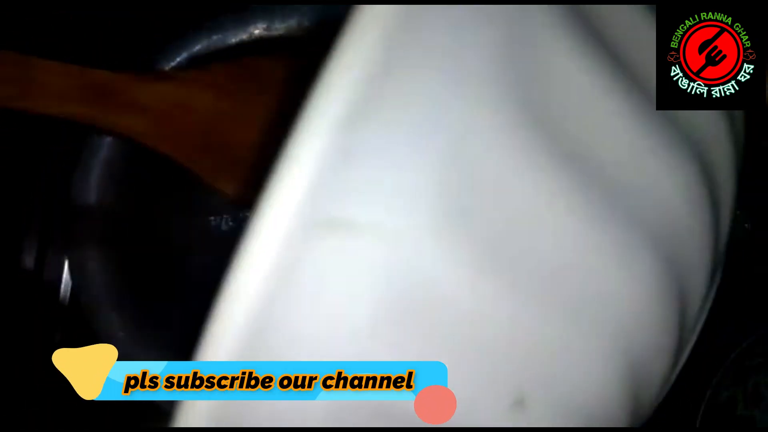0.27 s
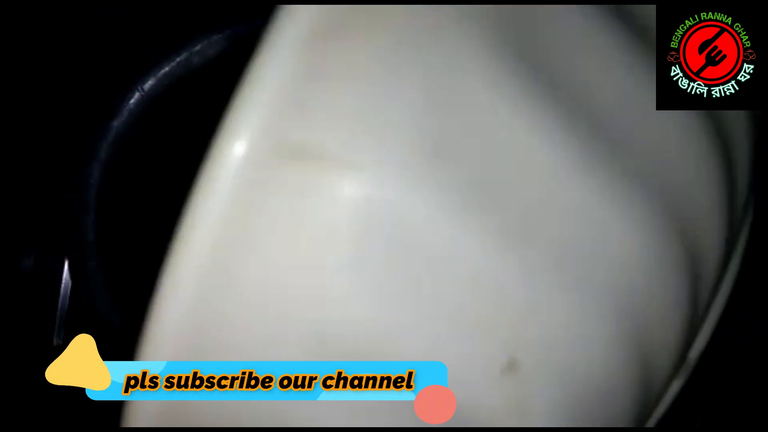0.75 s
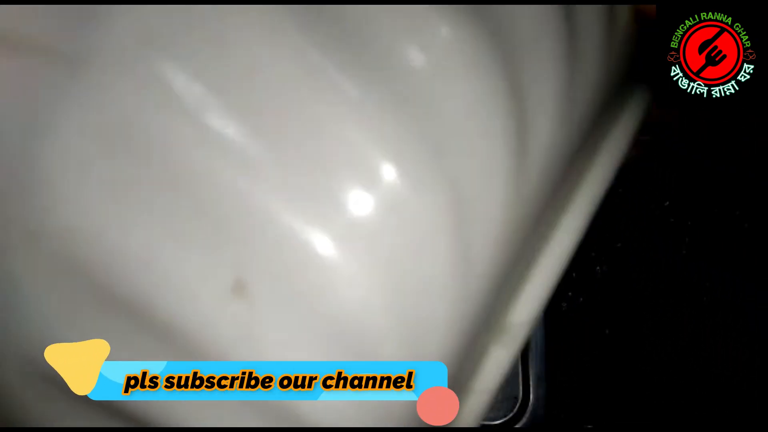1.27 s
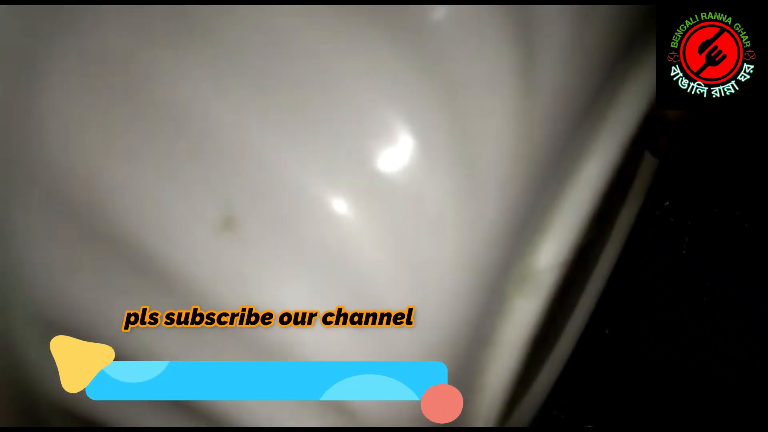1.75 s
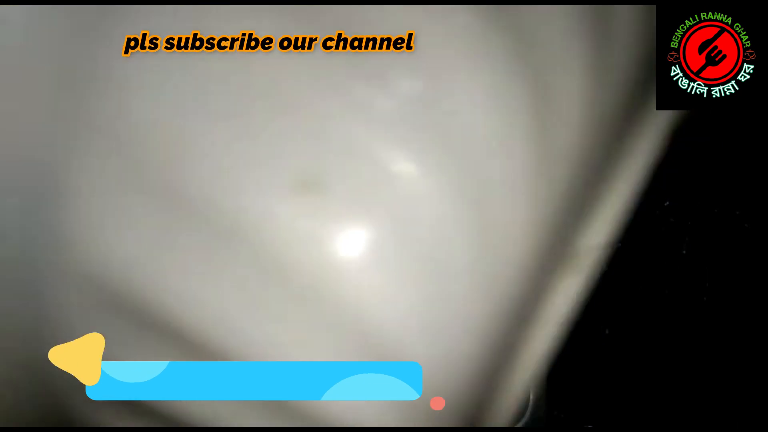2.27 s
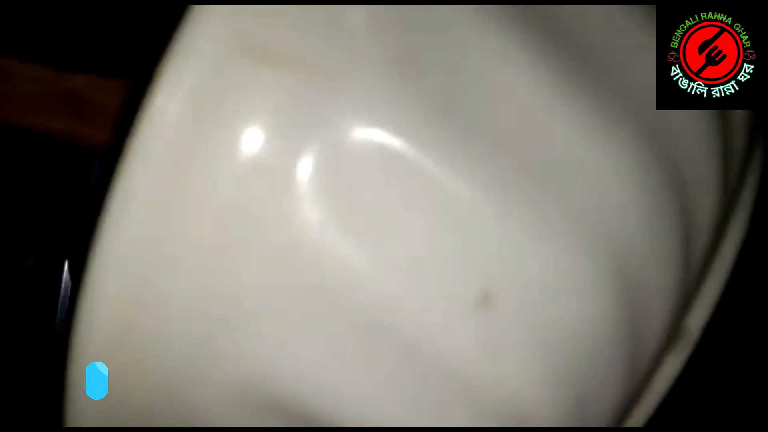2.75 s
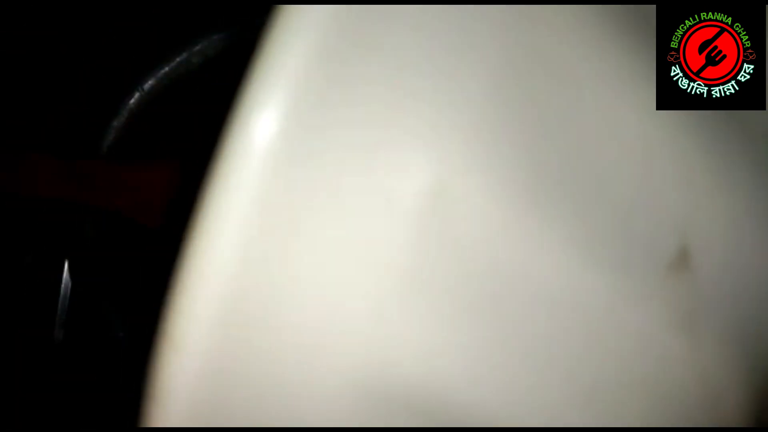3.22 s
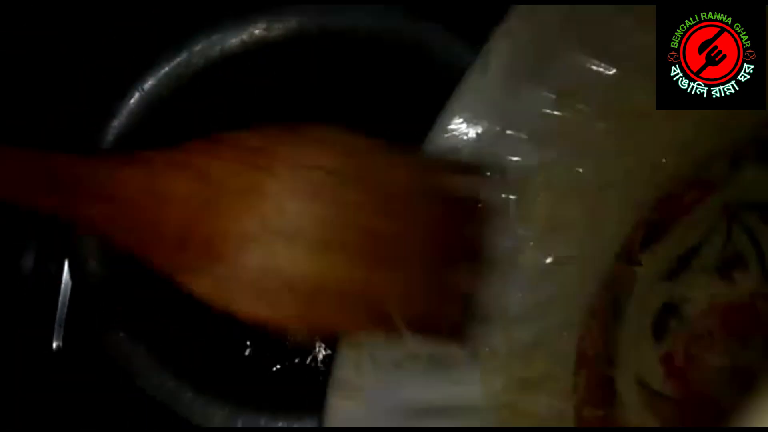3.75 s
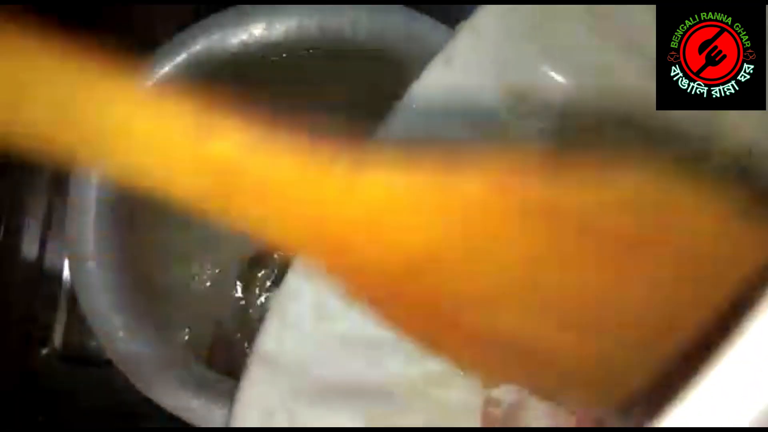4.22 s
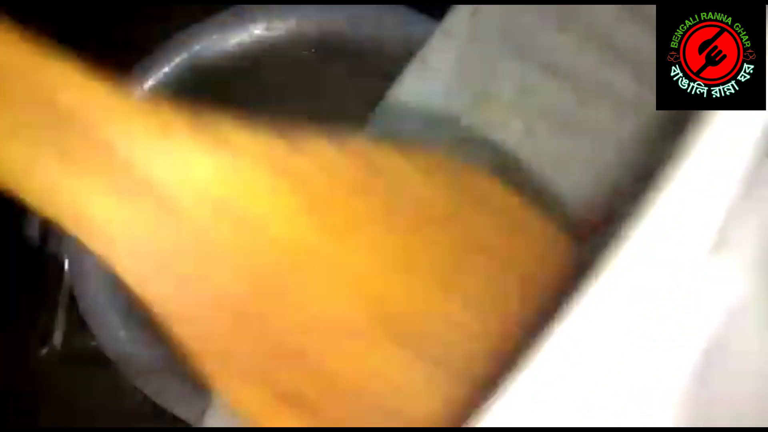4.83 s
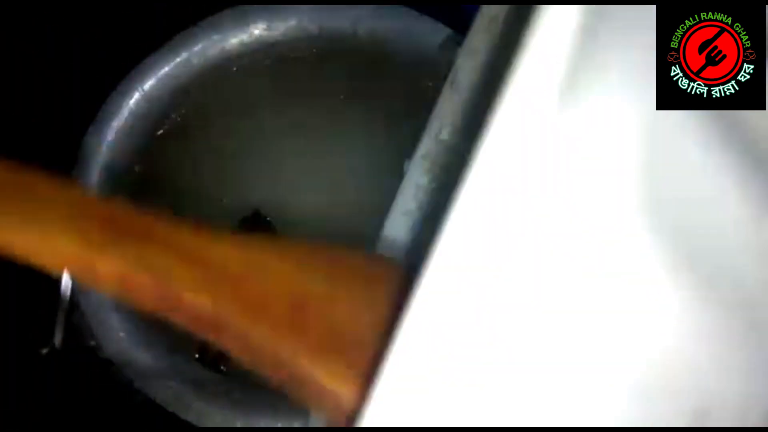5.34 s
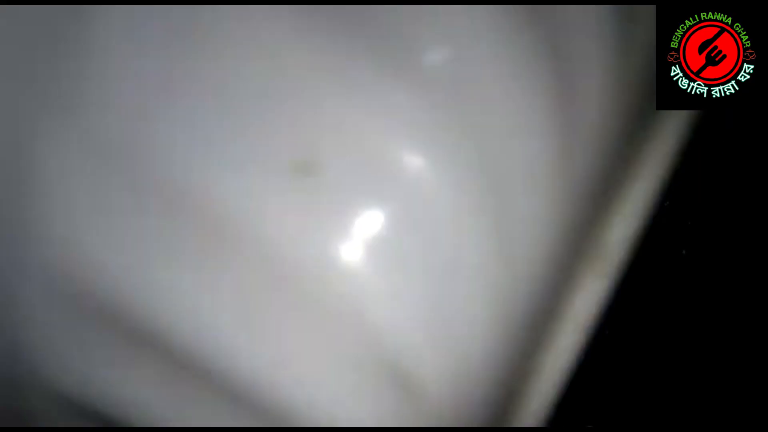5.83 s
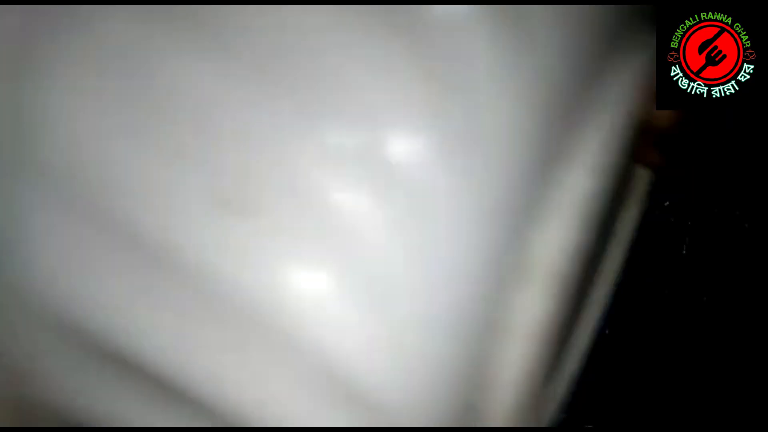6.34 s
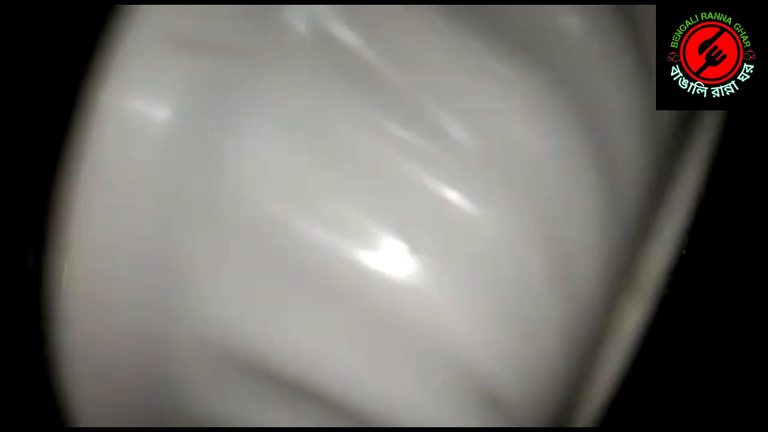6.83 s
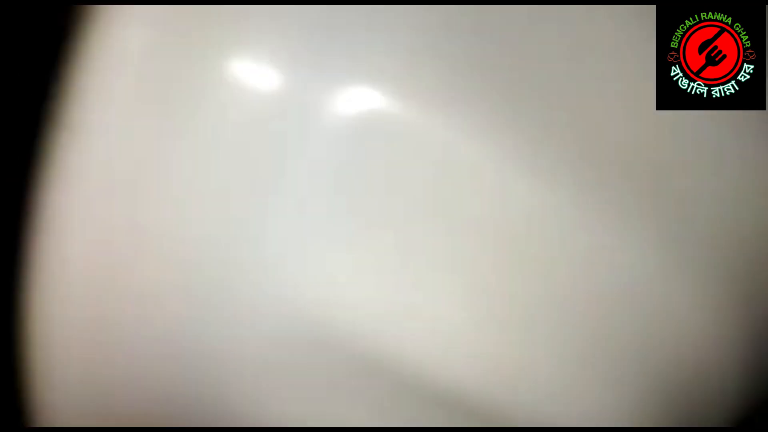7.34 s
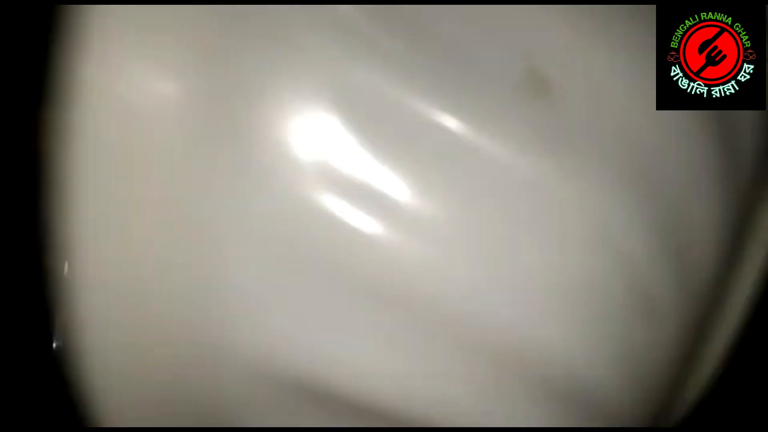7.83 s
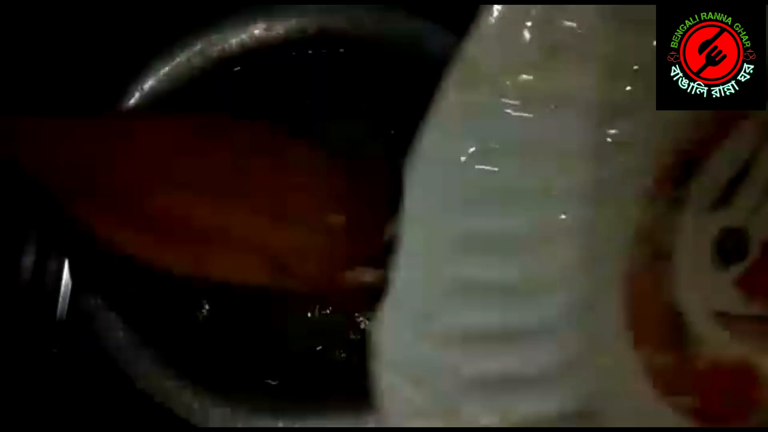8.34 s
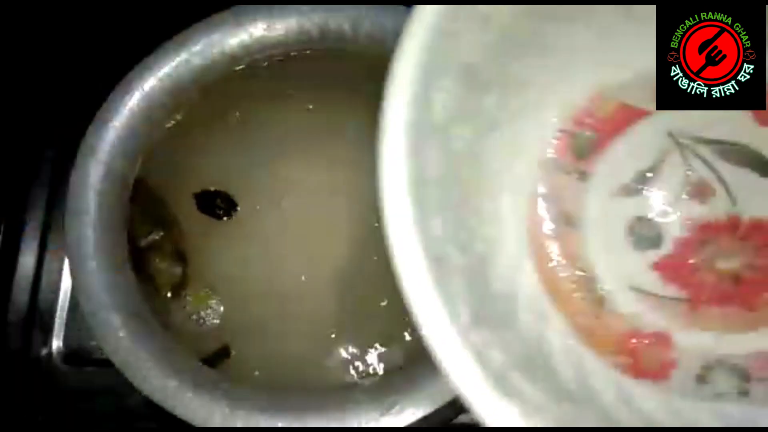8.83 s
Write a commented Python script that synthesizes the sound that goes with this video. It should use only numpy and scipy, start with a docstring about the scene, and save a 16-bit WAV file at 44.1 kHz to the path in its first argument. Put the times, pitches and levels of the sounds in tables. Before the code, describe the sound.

A wooden spatula scrapes wet rice from a plastic bowl, soft rustles and rasps giving way to hollow knocks that grow loud and crowded.

```python
"""From the start a wooden spatula works on a hard bowl; a low rumble, faint simmer and microphone hiss run throughout.
In a small kitchen, close to a small microphone, it pushes wet rice from the plastic bowl into a pot of hot water.
Pushes drive rustling grains (short rings), rubbing (bowl modes) and an edge rasp (clicks through resonances).
Knocks strike the bowl's modes, ticks are puffs of noise, gurgles are rising sines, and the room adds a tail."""
import sys
import numpy as np
from scipy import signal
from scipy.fft import rfft, irfft, next_fast_len
from scipy.io import wavfile

SR = 44100
rng = np.random.default_rng(int(sys.argv[2]) if len(sys.argv) > 2 else 0)


def dump_mix(stems):
    """Bounce the given channels to the path in sys.argv[1] as a 16-bit WAV at rate SR."""
    frames = np.atleast_2d(stems).T  # one column per channel
    limited = np.clip(frames, -1, 1)  # hard clip at full scale
    pcm = np.round(limited * 32767).astype(np.int16)
    wavfile.write(sys.argv[1], SR, pcm)


N = 400428   # length in samples


def from_db(db):
    """Amplitude factor for a level in dB."""
    return 10 ** (np.asarray(db) / 20)


def rms_one(x):
    """Scales a sound to an rms of 1."""
    return x / np.sqrt(np.mean(x ** 2) + 1e-20)


def at_hz(points, hz):
    """Reads a curve of (Hz, value) points on a logarithmic frequency axis."""
    point_hz, values = np.transpose(points)
    return np.interp(np.log(hz), np.log(point_hz), values)


def colour(x, spectrum):
    """Gives a flat sound the spectrum (Hz, relative dB per Hz); rms 1."""
    size = next_fast_len(len(x))
    hz = np.arange(size // 2 + 1) * SR / size + 1   # the 1 avoids the logarithm of zero
    gain = from_db(at_hz(spectrum, hz))
    return rms_one(irfft(rfft(x, size) * gain, size)[:len(x)])


def drift(rate_hz):
    """Slow random wander of rms 1: noise through two equal one-pole lowpasses."""
    r = np.exp(-2 * np.pi * rate_hz / SR)
    noise = rng.standard_normal(N + SR)
    settled = signal.lfilter([1], [1, -2 * r, r * r], noise)[SR:]
    return rms_one(settled)


def ring(clicks, hz, t60_s):
    """A resonance: a unit click starts a sine of height 1 that falls by 60 dB in t60_s."""
    r = from_db(-60 / (t60_s * SR))
    w = 2 * np.pi * hz / SR
    return signal.lfilter([0, np.sin(w)], [1, -2 * r * np.cos(w), r * r], clicks + 1e-18)


def grains(per_s, spread_db):
    """Random clicks of very unequal size and either sign, per_s of them a second on average; rms 1."""
    size_db = spread_db * np.minimum(rng.exponential(1, N), 5)
    sizes = from_db(size_db) * rng.choice([-1, 1], N)
    return rms_one(sizes * (rng.random(N) < per_s / SR))


# Colour of the low rumble. Each row: frequency in Hz, relative level in dB per Hz.
RUMBLE_SPECTRUM = [(15, -49.5), (25, -23), (61, -3.5), (118, 6), (144, 3.5), (317, -12.5), (400, -4),
                   (520, -35.5), (880, -120)]
# Rise and fall of the rumble around which it drifts. Each row: time in seconds, level in dB.
RUMBLE_LEVEL = [(0.0, -66), (0.25, -62.5), (1.64, -65.5), (1.97, -58.5), (3.74, -62), (4.47, -54),
                (4.73, -66), (5.51, -60.5), (5.64, -57), (6.68, -65.5), (6.85, -55), (7.0, -61),
                (7.23, -54.5), (7.36, -46), (8.02, -69), (8.42, -66), (8.67, -65.5), (9.08, -65.5)]


def rumble():
    """Low noise whose level follows a curve and wavers at random."""
    level_db = np.interp(np.arange(N) / SR, *np.transpose(RUMBLE_LEVEL))
    return from_db(level_db + 2.5 * drift(12)) * colour(rng.standard_normal(N), RUMBLE_SPECTRUM)


# Colour of the simmering pot, shared by the hiss. Each row: frequency in Hz, relative level in dB per Hz.
SIMMER_SPECTRUM = [(150, -17), (250, 5), (474, -4.5), (554, 6.5), (1390, -4.5), (2130, -7), (5530, -11),
                   (6570, -12.5), (8520, -25.5), (12000, -30), (15600, -29.5)]
SIMMER_DB = -66   # level around which the simmer wavers
HISS_DB = -79


def simmer():
    """The hot water is a faint coloured noise that wavers slowly in level."""
    return from_db(SIMMER_DB + 2.2 * drift(3.0)) * colour(rng.standard_normal(N), SIMMER_SPECTRUM)


def hiss():
    """The microphone's hiss is steady noise of the same colour as the simmer."""
    return from_db(HISS_DB) * colour(rng.standard_normal(N), SIMMER_SPECTRUM)


# Pushes of the spatula. Each row: loudest moment in seconds, swell in seconds, fade in seconds,
# control levels at that moment in dB for the rustle of rice, the rubbing of the bowl and the rasp of the edge.
STROKES = [(0.04, 0.061, 0.038, -57, -58, -55), (0.4, 0.21, 0.27, -45.5, -51, -53),
           (0.8, 0.3, 0.63, -59.5, -51, -74), (1.3, 0.32, 0.6, -47.5, -55.5, -76),
           (1.62, 0.32, 0.16, -44, -53.5, -73), (2.1, 0.47, 0.11, -55.5, -61, -45),
           (2.55, 0.24, 0.36, -53, -46.5, -50.5), (3.03, .05, 0.062, -57.5, -48.5, -45),
           (3.36, 0.45, 0.43, -65.5, -53.5, -65), (4.1, 0.38, 0.49, -61, -61, -55),
           (4.57, 0.14, 0.22, -44.5, -42.5, -41.5), (4.872, 0.03, 0.24, -56, -68, -52.5),
           (5.17, 0.23, 0.15, -53.5, -42, -47.5), (5.652, 0.15, 0.18, -44.5, -54, -42),
           (6.08, 0.37, .2, -52.5, -46.5, -53), (6.45, 0.18, 0.12, -54, -51, -55.5),
           (6.858, 0.16, 0.12, -52.5, -61.5, -58), (7.05, 0.22, 0.11, -53, -61.5, -64),
           (7.44, 0.14, 0.23, -42, -67, -35), (7.82, 0.076, 0.17, -52.5, -44.5, -52),
           (8.0, 0.045, 0.033, -59, -61, -65), (8.22, 0.05, 0.078, -57.5, -38.5, -41.5),
           (8.449, 0.26, 0.13, -73, -48, -71)]
STROKE_DROP_DB = 18.5   # loss at one swell or fade time from the loudest moment
REST_DB = -78.5         # control level that trickles on between pushes


def strokes():
    """Each push swells to its loudest moment and fades; gives control levels of rustle, rubbing and rasp in dB."""
    t = np.arange(0, N + 100, 100) / SR   # one point every 100 samples
    power = from_db(2 * REST_DB)          # doubled dB turn amplitude into power
    for loudest_s, swell_s, fade_s, *levels_db in STROKES:
        before = (loudest_s - t) / max(swell_s, .01)
        after = (t - loudest_s) / max(fade_s, .01)
        away = np.where(t < loudest_s, before, after)
        push_db = np.array(levels_db)[:, None] - STROKE_DROP_DB * away ** 1.6
        power = power + from_db(2 * push_db)
    return [np.interp(np.arange(N) / SR, t, 10 * np.log10(p)) for p in power]


# Colour of the rustling rice. Each row: frequency in Hz, relative level in dB per Hz.
RUSTLE_SPECTRUM = [(530, -26), (900, -8), (1090, -1), (1320, -2.5), (1780, -6), (2030, -3.5), (3080, -3.5),
                   (3590, 3), (6080, 1), (9120, -19), (11900, -27), (14900, -25), (15600, -33)]


def rice(rustle_db):
    """Thousands of wet grains a second slide in clumps; each rings a few cycles at one of 16 pitches."""
    clicks = from_db(3.5 * drift(30)) * grains(5000, spread_db=3.5)
    pitches_hz = np.geomspace(1000, 14000, 16)
    dealt = rng.integers(0, 16, N)   # which pitch a click at each sample gets
    rings = np.zeros(N)
    for k, hz in enumerate(pitches_hz):
        voice = rms_one(ring(clicks * (dealt == k), hz, 6.9 / hz))
        rings += from_db(6.1 * drift(22)) * voice * np.sqrt(hz)
    blend = rms_one(rings) + .5 * rng.standard_normal(N)
    return from_db(rustle_db) * colour(blend, RUSTLE_SPECTRUM)


# Modes of bowl and spatula. Each row: frequency in Hz, strength in dB relative to its group, t60 in seconds.
BOWL_MODES = [(135, 1, 0.04), (193.8, -1, 0.059), (273.3, -3, 0.073), (333, -10.5, 0.02),
              (420, -8.5, 0.041), (454.5, -9.5, 0.14), (560, 1.5, 0.04), (649.5, 1, 0.046), (732, 1, 0.053),
              (795.4, 0.5, 0.075), (882.2, -1, 0.084), (946.5, -2.5, 0.064), (1040, -14.5, 0.023),
              (1064, -31, 0.06), (1182, -9, 0.056), (1317, -8, 0.07), (1470, 3.5, 0.0055),
              (1840, -12, 0.023), (2130, -8, 0.034), (2200, -12, 0.018), (2660, -9.5, 0.023)]
# Upper limits in Hz of the thud and of the rings; the bright modes lie above.
GROUP_TOPS_HZ = [300, 1400]
# Spatula on bowl. Each row: start in seconds, nominal peak of the rings in dB, favoured ring in Hz,
# mean level of the thud and of the bright modes in dB against that peak,
# purity: the most that other rings fall behind the favoured one, in dB.
KNOCKS = [(0.043, -43, 1270, -22.5, -10, 29), (0.142, -25, 677, -17.5, -8, 11),
          (0.339, -37.5, 1220, -27, 7.5, 12), (0.446, -34.5, 1310, -22, -6, 20),
          (0.652, -33, 412, -9.5, -6, 14), (0.87, -38.5, 1310, -11, -5, 17), (1.04, -53, 1300, -12, 11, 16),
          (1.145, -38.5, 1290, -34, -6, 25), (1.347, -18, 700, -27, -22, 17),
          (1.463, -36.5, 800, -26, -19, 18), (1.689, -36, 955, -15, -18, 15),
          (1.803, -24, 727, -22, -4, 14), (2.285, -54, 409, 11.5, -21, 14),
          (2.369, -31.5, 450, 2, -12, 12.5), (2.507, -24, 415, -14, -17, 13),
          (2.541, -22.5, 693, -43, -12.5, 26), (2.645, -42, 560, -26, -8, 14),
          (2.939, -29, 560, -12, -14.5, 14), (3.31, -16.5, 694, -14, -8, 9.4),
          (3.674, -23.5, 887, -17.5, -31, 21), (3.981, -47.5, 401, 5, -6, 14),
          (4.019, -28, 557, -12.5, -14.5, 16), (4.113, -52, 404, 3.5, -3, 14),
          (4.242, -37.5, 540, -4.5, -28, 16), (4.332, -30, 420, -7.5, -13, 7.7),
          (4.392, -33, 416, -9, -19, 14), (4.441, -39, 410, -1, -7, 14), (4.485, -21.5, 853, -13, -18, 16),
          (4.509, -11.5, 668, -25.5, -22, 13), (4.528, -8, 634, -30, -19.5, 18),
          (4.912, 0.5, 850, -30.5, -15, 9.7), (5.115, -31, 1090, -37, -4.5, 9.8),
          (5.182, -21.5, 645, -49, -16.5, 12.4), (5.405, -3.5, 658, -22, -21.5, 15),
          (5.611, -29, 802, -33.5, -17, 9.2), (5.862, -5.5, 875, -29.5, -26.5, 13.8),
          (5.99, -32, 560, -30, -7, 14), (6.295, -13.5, 960, -15, -19, 15),
          (6.361, -15.5, 905, -15.5, -16, 11.6), (6.649, -2.5, 927, -16.5, -13, 18.3),
          (6.697, -2, 836, -29.5, -7, 17.5), (6.858, -15.5, 948, -22, -25, 17),
          (6.966, -17.5, 634, -19.5, -22, 14), (6.978, -7.5, 878, -25.5, -3, 16.5),
          (7.18, -16.5, 634, -9.5, -20, 15), (7.325, -5, 653, -41, -20, 13), (7.333, -3, 596, -22, -26, 17),
          (7.375, -15, 880, -39, -14, 16), (7.401, -16, 856, -12.5, -16, 13),
          (7.421, -10.5, 866, -37, -12, 12), (7.437, -10.5, 880, -42, -13, 27),
          (7.459, -20.5, 920, -16, -8, 17), (7.482, -12.5, 867, -29, -12.5, 12.7),
          (7.505, -21, 924, -28, -17, 15), (7.543, -27.5, 885, -12, -8, 17),
          (7.745, -28, 546, -5.5, -30, 12), (7.776, -14.5, 608, -23, -17, 20),
          (7.803, -21.5, 874, -26, -21, 15.5), (7.832, -23.5, 822, -19, -23, 10.5),
          (7.86, -29.5, 877, -18, -10, 14), (8.165, -26, 882, -15, -10, 12.4),
          (8.463, -19.5, 910, -12, -11.5, 20)]
CONTACT_HZ, BUILD_UP_S = 2540, 0.001123   # a soft contact: little treble, and a blow just after the touch
FAVOUR_DB_PER_OCTAVE = 119   # rings far from the favoured one are struck more weakly
KNOCK_CREST_DB = 7.5         # turns a mean level into a peak for thud and bright modes


def bowl(rub_db):
    """Wooden knocks and rubbing drive the same plastic modes; where a blow lands sets the ring it favours."""
    start_s, peak_db, favoured_hz, thud_db, bright_db, purity_db = np.transpose(KNOCKS)
    at = np.round((start_s + BUILD_UP_S) * SR).astype(int)
    mode_hz, mode_db, _ = np.transpose(BOWL_MODES)
    group = np.searchsorted(GROUP_TOPS_HZ, mode_hz)   # 0 thud, 1 rings, 2 bright
    shares = from_db(mode_db) / np.bincount(group, from_db(mode_db))[group]

    octaves = np.abs(np.log2(mode_hz / favoured_hz[:, None]))
    apart_db = np.minimum(FAVOUR_DB_PER_OCTAVE * octaves, purity_db[:, None])
    struck = shares * from_db(-apart_db * (group == 1))
    groups_db = [thud_db + KNOCK_CREST_DB, 0 * start_s, bright_db + KNOCK_CREST_DB]
    for g, group_db in enumerate(groups_db):
        # the modes of a group add up to its nominal peak
        total = struck[:, group == g].sum(axis=1)
        struck[:, group == g] *= (from_db(peak_db + group_db) / total)[:, None]
    struck *= from_db(2.5 * rng.standard_normal(struck.shape) + 3)   # uneven blows, 3 dB up

    rub = from_db(rub_db - 23) * grains(1100, spread_db=6.0)
    out = np.zeros(N)
    for k, (hz, _, t60_s) in enumerate(BOWL_MODES):
        force = shares[k] * rub
        force[at] -= struck[:, k]
        # a bending mode pushes no air far from its pitch
        radiated = signal.butter(2, [hz / 4, hz * 2.5], "band", fs=SR)
        out += signal.lfilter(*radiated, ring(force, hz, t60_s))
    contact = signal.butter(4, CONTACT_HZ, fs=SR, output="sos")
    return signal.sosfilt(contact, out)


# Resonances of the spatula's edge. Each row: frequency in Hz, relative drive in dB, t60 in seconds.
EDGE_MODES = [(2130, -7, 0.0074), (2400, 1.5, 0.045), (2680, 7.5, 0.0065), (2870, -2.5, 0.0083)]


def rasp(rasp_db):
    """The edge catches and slips on the wall in uneven, dense clicks that ring its resonances."""
    slips = from_db(3.4 * drift(30)) * grains(3500, spread_db=4.0)
    rings = sum(from_db(db) * ring(slips, hz, t60_s) for hz, db, t60_s in EDGE_MODES)
    return from_db(rasp_db - 9.5) * rms_one(rings)


# Sharp ticks of grains and of the spatula's edge. Each row: start in seconds, nominal peak in dB, centre in Hz.
TICKS = [(0.125, -44, 1960), (0.1406, -30.5, 5810), (0.3391, -33, 2000), (0.5841, -30, 4470),
         (0.7017, -36.5, 2360), (0.7906, -63, 5220), (1.258, -34, 5950), (1.3623, -33, 5500),
         (1.4601, -31.5, 2870), (1.5249, -36, 3990), (1.5846, -36, 3940), (1.6192, -32, 3530),
         (1.8024, -28, 2020), (2.1251, -29, 5630), (2.3415, -35.5, 3600), (2.3668, -32.5, 3550),
         (2.39, -27, 5370), (2.5086, -28, 2370), (2.5324, -25, 2600), (2.9378, -32.5, 2370),
         (3.021, -36, 4400), (3.3066, -21, 3800), (3.3854, -28, 5710), (3.5334, -41.5, 2120),
         (3.6718, -23.5, 2060), (3.7599, -33.5, 2690), (3.8382, -40.5, 2680), (3.8721, -38.5, 2690),
         (4.2293, -37.5, 2070), (4.5087, -30, 2100), (4.5303, -44, 2030), (4.5531, -28, 3840),
         (4.812, -32, 2850), (4.8508, -27, 3530), (4.9134, -24, 2090), (5.1689, -29, 2340),
         (5.2108, -31, 2310), (5.4066, -32.5, 2120), (5.562, -34, 5840), (5.6116, -25, 2340),
         (5.6613, -23.5, 3800), (5.846, -45.5, 2370), (5.9567, -31, 4180), (6.128, -33, 3880),
         (6.2963, -36, 2870), (6.341, -37, 2400), (6.3597, -22, 2610), (6.5047, -32, 5520),
         (6.6468, -21, 2120), (6.6984, -5.5, 2670), (6.8589, -11, 2570), (6.979, -11, 2660),
         (7.1799, -18.5, 2120), (7.3043, -35, 3880), (7.323, -41, 2290), (7.3726, -28.5, 2160),
         (7.399, -19.5, 4910), (7.4215, -18, 2360), (7.5086, -19, 2660), (7.5436, -22.5, 2760),
         (7.6011, -30, 2600), (7.7494, -36, 3470), (7.7732, -28.5, 5500), (7.8097, -29.5, 2320),
         (7.8424, -29, 2500), (8.1628, -25, 2330), (8.185, -22, 2610), (8.4033, -46.5, 3040),
         (8.4527, -37.5, 2260), (8.4667, -39.5, 2220)]
# Colour shared by all ticks. Each row: frequency in Hz, relative level in dB per Hz.
TICK_SPECTRUM = [(1200, -11), (2000, 1.5), (6500, -2.5), (8500, -15.5), (11500, -24), (15000, -25)]
SMALL_TICKS = 200     # many more come by chance
SMALL_TICK_DB = 7.5   # the weakest of these peak about this far above the rustle control level
TICK_CREST_DB, TICK_T60_S = 10, 0.055   # nominal peak above the puff's starting rms; its decay


def ticks(rustle_db):
    """Each tick is a puff of noise that dies at once, broad around its centre."""
    out = np.zeros(N + SR)
    t = np.arange(SR // 10) / SR
    when, size, pitch = rng.random((SMALL_TICKS, 3)).T
    small_db = rustle_db[(when * N).astype(int)] + SMALL_TICK_DB - 4 * np.log(size + 0.0065)
    small_ticks = zip(when * N / SR, small_db, 2200 * 2.8 ** pitch)
    every = list(TICKS) + list(small_ticks)
    noise = rng.standard_normal(len(every) * len(t))
    puffs = colour(noise, TICK_SPECTRUM).reshape(len(every), -1)
    attack = 1 - np.exp(-t / 0.00016)
    for (start_s, peak_db, hz), puff in zip(every, puffs):
        band = signal.butter(1, [hz / 1.3, hz * 1.4], "band", fs=SR)
        shape = from_db(peak_db - TICK_CREST_DB - 60 * t / TICK_T60_S) * attack
        i = round(start_s * SR)
        out[i:i + len(t)] += shape * rms_one(signal.lfilter(*band, puff))
    return out[:N]


# Bubbles that gurgle in the pot. Each row: start in seconds, peak in dB, start and end pitch in Hz, length in seconds.
GURGLES = [(0.746, -55, 560, 598, 0.041), (3.817, -57.5, 447, 460, 0.058), (3.931, -49, 319, 435, 0.105)]


def gurgles():
    """A bubble is a short swelling sine whose pitch rises as it nears the surface."""
    out = np.zeros(N)
    for start_s, peak_db, start_hz, end_hz, length_s in GURGLES:
        part = np.linspace(0, 1, round(length_s * SR))
        pitch_hz = start_hz + (end_hz - start_hz) * part
        phase = 2 * np.pi * np.cumsum(pitch_hz) / SR
        bubble = from_db(peak_db) * np.sin(np.pi * part) * np.sin(phase)
        out[round(start_s * SR):][:len(part)] += bubble
    return out


# Decay of the small kitchen. Each row: frequency in Hz, t60 in seconds.
KITCHEN_DECAY = [(150, 0.24), (500, 0.32), (1500, 0.21), (4000, 0.3), (9000, 0.29)]
KITCHEN_DB, FIRST_ECHO_S = -9.5, 0.0058   # gain of the unit-energy tail; silence before it


def kitchen(x):
    """A tail of dense echoes, noise whose octaves each die at their own rate."""
    t = np.arange(SR // 2) / SR
    tail = np.zeros(len(t))
    for low_hz in 45 * 2 ** np.arange(8):
        band = signal.butter(2, [low_hz, 2 * low_hz], "band", fs=SR, output="sos")
        octave = signal.sosfilt(band, rng.standard_normal(len(t)))
        tail += octave * from_db(-60 * t / at_hz(KITCHEN_DECAY, 1.4 * low_hz))
    tail *= t > FIRST_ECHO_S
    unit_tail = tail / np.sqrt(np.sum(tail ** 2))
    return from_db(KITCHEN_DB) * signal.fftconvolve(x, unit_tail)[:N]


def scene():
    """Everything near the microphone, its echo in the room, and the background."""
    background = rumble() + simmer() + hiss()
    rustle_db, rub_db, rasp_db = strokes()
    near = rice(rustle_db) + bowl(rub_db) + rasp(rasp_db) + ticks(rustle_db) + gurgles()
    return (near + kitchen(near) + background)[None]


MIC_LOW_HZ = 68      # the microphone weakens bass below this
TOP = 1              # the loudest knocks are rounded off towards this amplitude
CUTOFF_HZ = 16450    # from here up the treble is at least 60 dB down


def record(dry):
    """A small microphone loses the deepest bass, peaks are rounded and the top is cut."""
    bass_cut = signal.butter(2, MIC_LOW_HZ, "high", fs=SR, output="sos")
    thin = signal.sosfilt(bass_cut, dry)
    rounded = thin / (1 + (thin / TOP) ** 4) ** (1 / 4)
    treble_cut = signal.cheby2(12, 60, CUTOFF_HZ, fs=SR, output="sos")
    return signal.sosfilt(treble_cut, rounded)


dry = scene()
out = record(dry)
dump_mix(out)
```